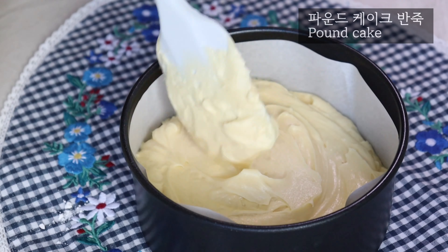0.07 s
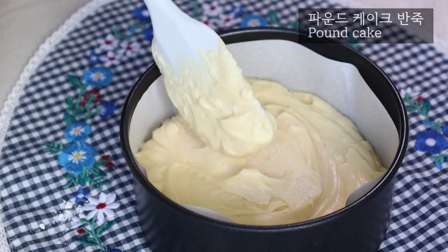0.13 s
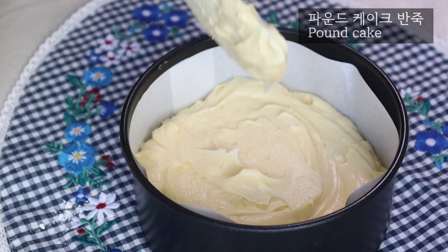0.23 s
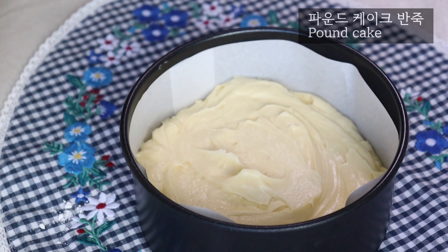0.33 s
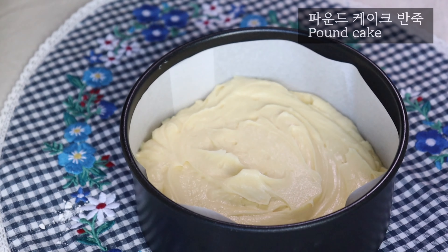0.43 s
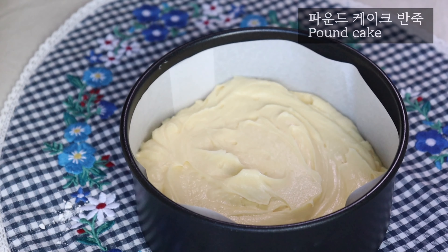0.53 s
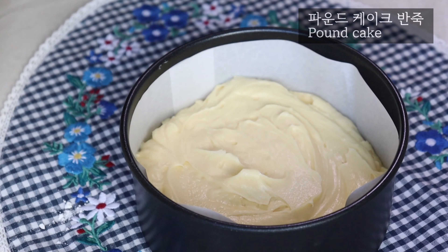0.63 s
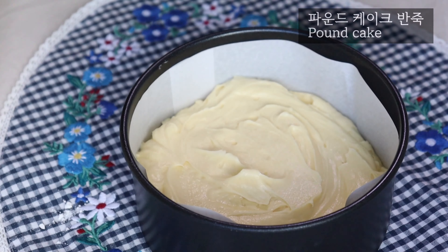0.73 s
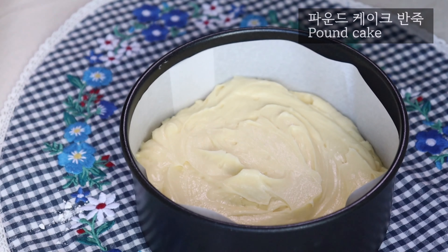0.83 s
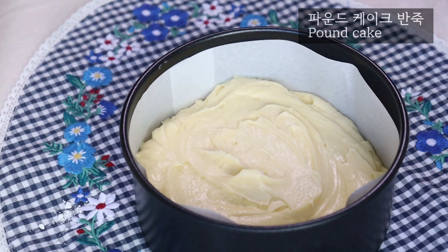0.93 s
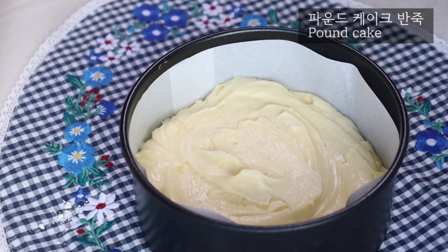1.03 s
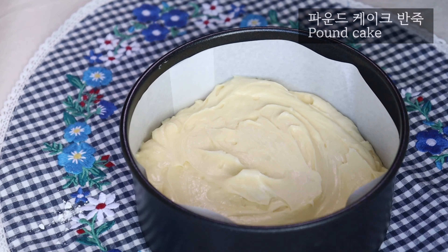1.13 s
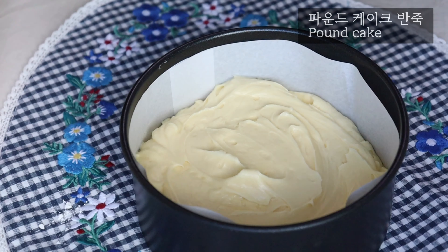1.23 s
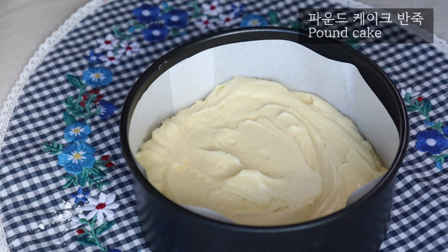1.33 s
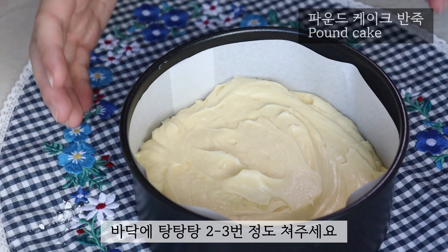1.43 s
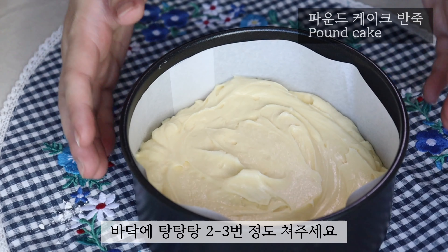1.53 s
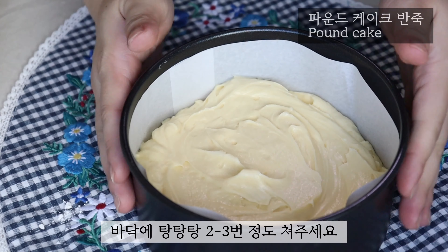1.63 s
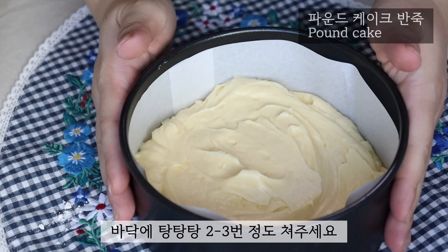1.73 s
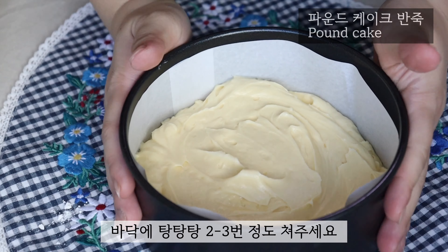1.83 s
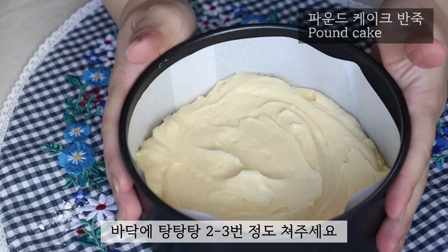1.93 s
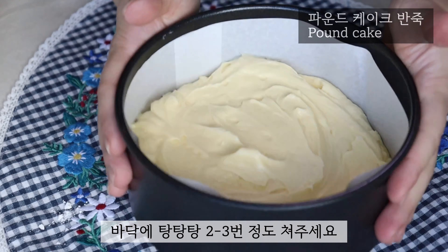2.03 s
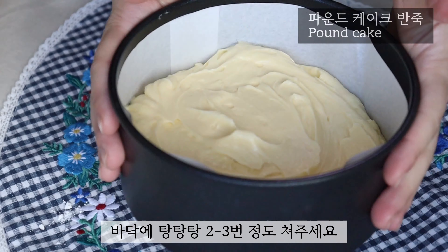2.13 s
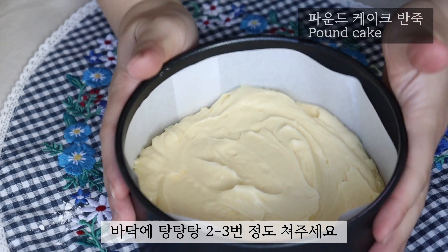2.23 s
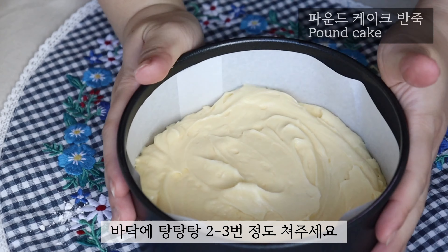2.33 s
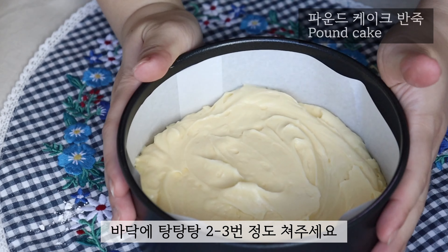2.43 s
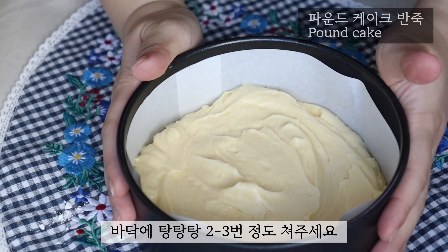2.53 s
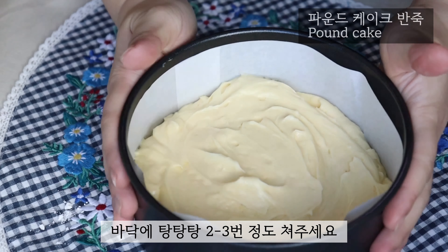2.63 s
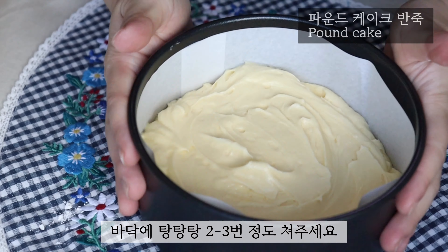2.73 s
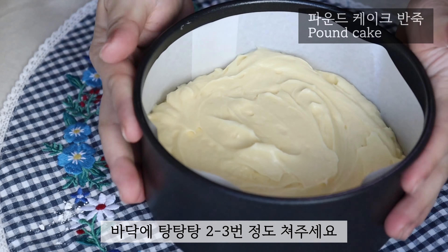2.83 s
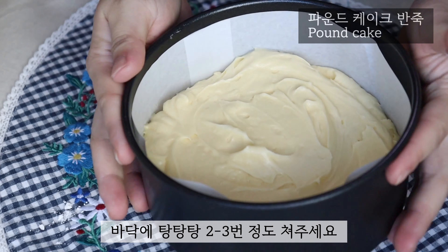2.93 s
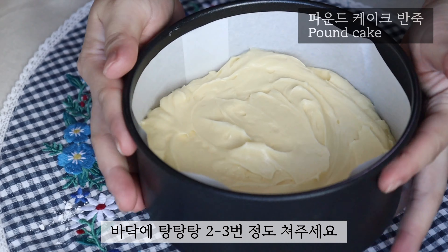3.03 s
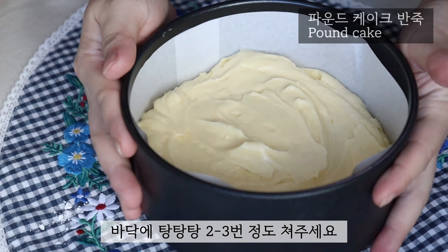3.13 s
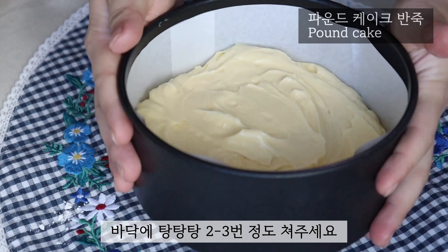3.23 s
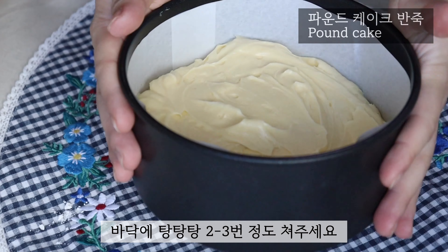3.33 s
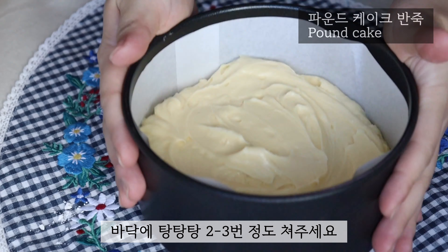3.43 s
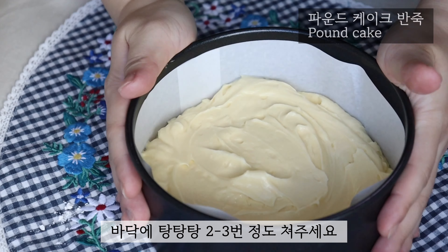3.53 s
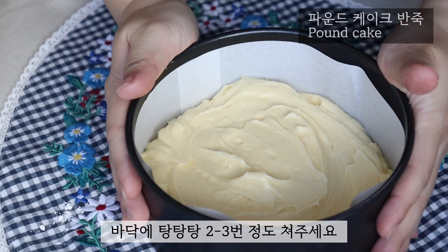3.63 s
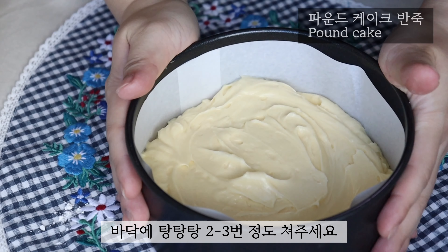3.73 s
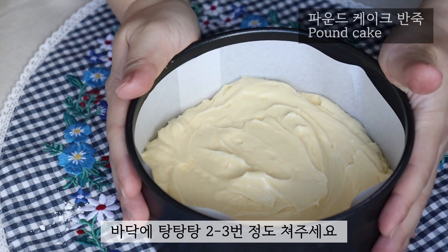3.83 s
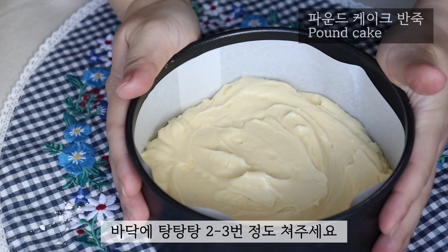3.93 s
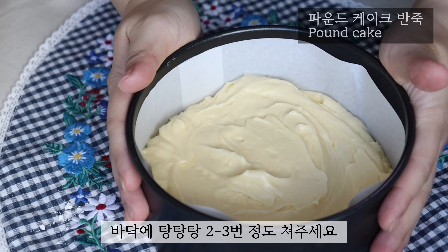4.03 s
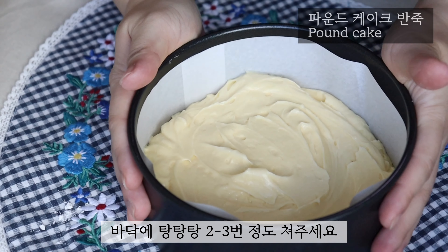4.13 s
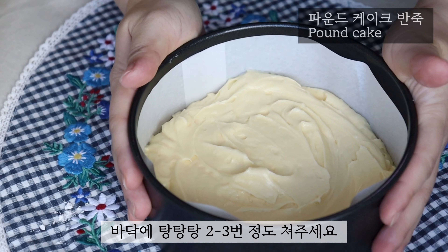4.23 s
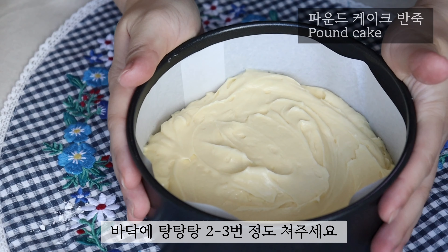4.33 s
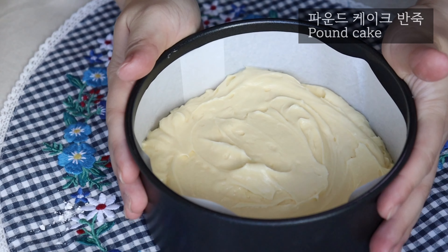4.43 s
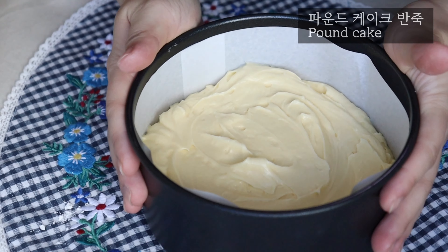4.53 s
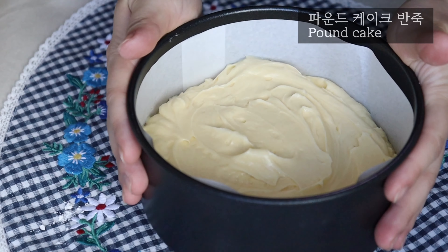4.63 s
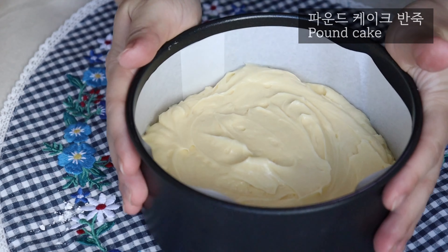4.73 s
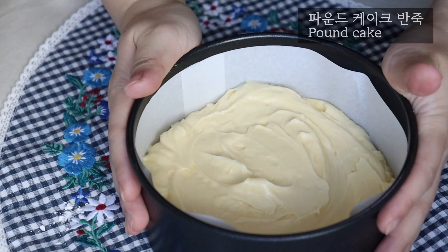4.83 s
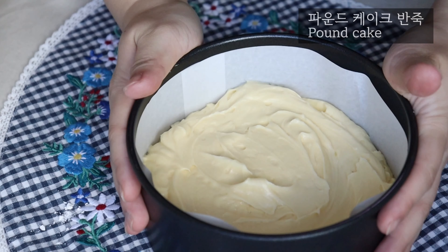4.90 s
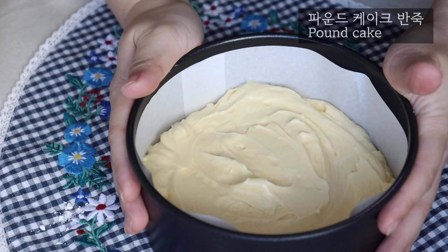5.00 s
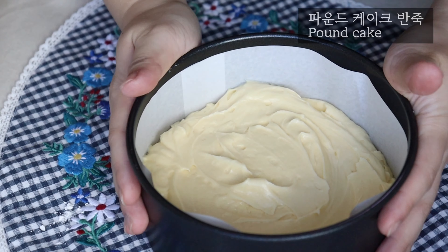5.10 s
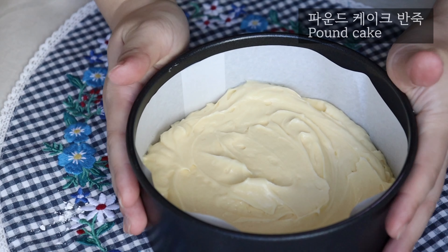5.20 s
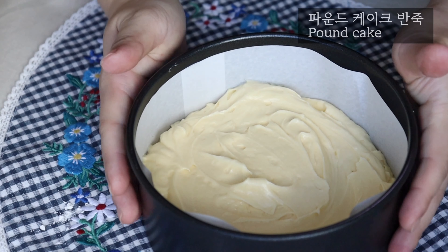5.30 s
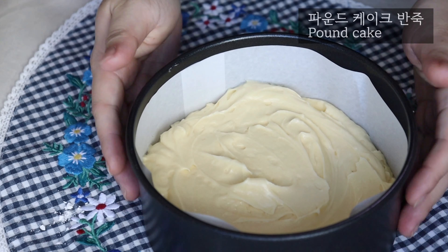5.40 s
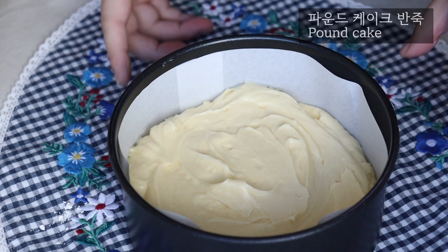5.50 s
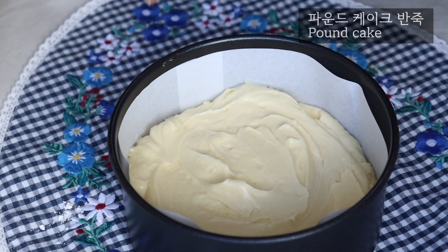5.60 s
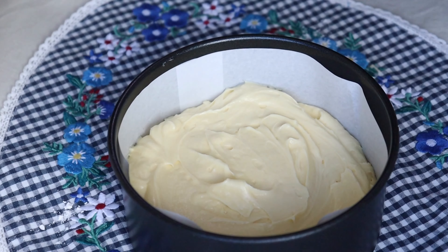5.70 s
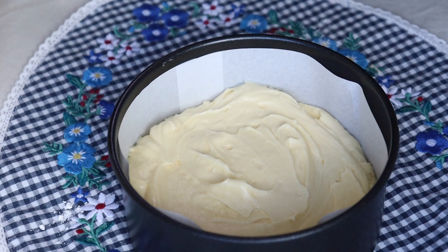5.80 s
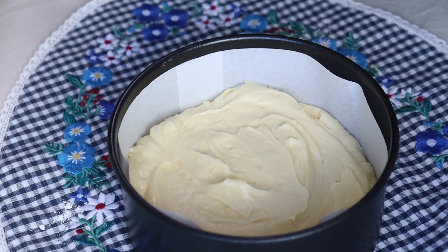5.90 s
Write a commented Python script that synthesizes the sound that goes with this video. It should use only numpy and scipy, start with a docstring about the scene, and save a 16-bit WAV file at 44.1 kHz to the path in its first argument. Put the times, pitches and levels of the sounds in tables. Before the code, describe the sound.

In a small, hard-walled kitchen, a spatula faintly brushes batter and a few tiny ticks sound near the microphone as a steady appliance hum steps down in pitch. Hands slide softly over a filled metal cake pan, then bang it on a cloth-covered table three times, a little over a second apart. Every deep thump brings a sharp metallic clatter right behind it. The pan shifts lightly and the hum carries on.

```python
"""A low appliance hum fills a small kitchen and drops abruptly in pitch about a second in.
Faint ticks sound close to the microphone; a spatula, then hands, brush a metal cake pan full of batter.
The pan is knocked three times on a cloth-covered table, with the hard room ringing around it.
Each knock is a low thud of the table top, then some 60 ms later a bright clank and rattle
as the pan's loose metal lands again."""
import sys
import numpy as np
from scipy import signal
from scipy.fft import rfft, irfft
from scipy.io import wavfile
from scipy.ndimage import uniform_filter1d

SR = 44100
rng = np.random.default_rng(int(sys.argv[2]) if len(sys.argv) > 2 else 0)


def generate_wav(sig):
    """Save sig (samples, or channels by samples) to the path in sys.argv[1] as 16-bit PCM at SR."""
    pcm = np.round(np.clip(np.atleast_2d(sig).T, -1, 1) * 32767).astype(np.int16)
    wavfile.write(sys.argv[1], SR, pcm)


N = 262836

# Room tone after the pitch drop. Each row: frequency in Hz, relative level in dB.
ROOM_TONE = [(25, -1), (62, 11), (95, 2.5), (150, 0.5), (300, 1.5), (480, 0.5), (600, -4.5), (1300, -8),
             (3500, -19.5), (4500, -21.5), (5050, -17.5), (5700, -23), (9000, -27), (15500, -30.5)]
# Appliance hum after the pitch drop. Each row: frequency in Hz, base rms level in dB, waver in dB.
HUM_LINES = [(51.4, -37, 2.6), (121.1, -49.5, 3.5), (146.3, -58.5, 6), (216.8, -51, 0.5), (239.6, -54, 2),
             (363.5, -53.5, 3.5), (396.5, -57, 2.5), (491, -66.5, 5), (1322, -65, 2.5), (2110, -69, 3)]
# The hum lines between 300 and 450 Hz swell and sink. Each row: time in seconds, gain in dB.
HUM_SWELL = [(0, 1), (1.1, -1.5), (1.4, 5), (1.8, 5.5), (2.15, 0.5), (2.7, 6), (2.95, -2.5), (4.3, -1.5),
             (5.96, -0.5)]
# The kitchen's reverberation. Each row: frequency in Hz, t60 in seconds.
ROOM_T60 = [(150, 0.47), (600, 0.44), (2000, 0.29), (6000, 0.28), (10000, 0.28), (16000, 0.23)]
# Strokes over batter, pan and cloth. Each row: start in seconds, length in seconds, level in dB.
BRUSH_STROKES = [(.05, 0.16, -59), (1.627, 0.27, -56), (1.91, .15, -62), (2.79, 0.11, -58),
                 (2.89, 0.14, -58), (3.05, .13, -56), (3.19, .11, -56.5), (3.3, 0.17, -56.5),
                 (5.2, 0.37, -62.5), (5.75, 0.27, -65)]
# Small high ticks. Each row: start in seconds, level in dB.
TICKS = [(0.925, -35), (0.941, -40), (.958, -39.5), (1.36, -48), (1.4265, -36), (1.449, -44)]
# The table top under the pan. Each row: frequency in Hz, relative level in dB, free t60 in seconds.
TABLE_MODES = [(59.5, -11.5, 0.52), (79, -6, 0.16), (103, -3.5, 0.023), (136, -8.5, 0.09), (190.3, -2, 0.4),
               (228, 0.5, 0.06), (256, -56, 0.045), (331.5, -6.5, 0.32), (388, -6, 0.1), (465, -13, 0.054),
               (576, -8, .06), (700, -36, 0.167)]
# The dull slap under the pan. Each row: frequency in Hz, relative level in dB.
SLAP_SPECTRUM = [(120, -2.5), (320, -6.5), (600, 5.5), (1000, -3.5), (2000, -4.5), (3500, -12.5),
                 (6000, -17.5), (7800, -25.5), (11500, -26.5), (16000, -37)]
# The pan's wall and base. Each row: frequency in Hz, relative level in dB, free t60 in seconds.
PAN_MODES = [(930, -14, 0.34), (1067, -10, 0.12), (1144, -8, 0.073), (1151, -3.5, 0.023), (1779, -4, 0.051),
             (1880, -6.5, 0.14), (1997, -3, 0.093), (2846, -6.5, 0.22), (3266, -13, 0.37),
             (3560, -10, 0.11), (3623, -17, 0.72), (4200, -1.5, 0.064), (4250, -23, 0.098),
             (4330, -19, 0.8), (4540, -5, 0.076), (4930, -36, 0.143), (4830, -12, 0.039),
             (5575, -3.5, 0.27), (5650, -8, 0.17), (6530, -11, 0.41), (7881, -13, 0.38),
             (8630, -10.5, 0.16), (9890, -9, 0.081), (10440, -11.5, 0.041), (11270, -11.5, 0.053),
             (11370, -6.5, 0.043)]
# The pan's crowd of weaker modes. Each row: frequency in Hz, relative level in dB.
PAN_WASH = [(250, 2.5), (600, 0), (1150, 1), (1500, -8), (1950, -2), (2500, 0), (4400, 0), (5900, -1),
            (7200, -8), (10200, -6.5), (12500, -9), (16000, -19)]
# Light shifts of the pan. Each row: start in seconds, level in dB, tilt in dB per octave.
NUDGES = [(3.995, -30, -4), (5.087, -39, -14)]
# The pan meets the table. Each row: start in seconds, level in dB, contact in ms, share of the free
# ring time, then in dB: slap, far edge relative to the blow, far edge's slap, first rock, settling.
KNOCKS = [(2.2979, -3, 3.62, 0.47, -14, -14.5, -16, -24, -20.5),
          (3.544, -3, 6, 0.79, -21.5, -5, -14.5, -11, -17.5),
          (4.8366, -5, 7, 0.56, -26, -4.5, -19.5, -12.5, -46)]
# Loose metal lands. Each row: start in seconds, level in dB, tilt in dB per octave, share of the free
# ring time, favoured frequency in Hz, first rattle gap in seconds, first rebound relative to the
# landing in dB, fall per rebound in dB.
LANDINGS = [(2.369, 0, -1.5, 1, 5500, .0123, -3, 2.5), (3.609, 2, -1, 1, 2840, .013, 1.5, 7),
            (4.897, 3, -1, 0.4, 4400, .0027, -3.5, 4)]


def undb(db):
    """Decibels to gain."""
    return 10 ** (np.asarray(db) / 20)


def unit(x):
    """Scale to rms 1."""
    return x / np.sqrt(np.mean(x ** 2))


def seconds(length):
    """Time axis."""
    return np.arange(int(length * SR)) / SR


def add(out, start_s, x):
    """Mix x into out at start_s."""
    i = int(start_s * SR)
    out[i:i + len(x)] += x[:N - i]


def lookup(points, hz):
    """Read (Hz, value) points on a log-frequency axis."""
    freqs, values = np.transpose(points)
    return np.interp(np.log(np.maximum(hz, 1)), np.log(freqs), values)


def noise(points, size):
    """Noise of rms 1 with a (Hz, dB) spectrum."""
    gain = undb(lookup(points, np.fft.rfftfreq(size, 1 / SR)))
    return unit(irfft(rfft(rng.standard_normal(size)) * gain, size))


def band(x, lo_hz, hi_hz):
    """Band-pass."""
    edges = [lo_hz, min(hi_hz, SR / 2 - 10)]
    return signal.sosfilt(signal.butter(2, edges, "band", fs=SR, output="sos"), x)


def fade(t, t60):
    """Free decay, 60 dB in t60 seconds."""
    return np.exp(-np.log(1000) * t / t60)


def drift(rate_hz):
    """Smooth random drift of rms 1."""
    size = int(SR / rate_hz)
    held = np.repeat(rng.standard_normal(N // size + 1), size)
    return unit(uniform_filter1d(uniform_filter1d(held, size), size)[:N])


def appliance_hum(pitch_ratio, room_tone_db=-43, wander=0.00271):
    """Wavering hum lines over the room tone, all pitched by one ratio."""
    flutter_db = 0.5 * drift(5)
    room_tone = noise([(hz * pitch_ratio, db) for hz, db in ROOM_TONE], N)
    out = undb(room_tone_db + flutter_db) * room_tone
    swell_db = np.interp(np.arange(N) / SR, *np.transpose(HUM_SWELL))
    for hz, db, waver_db in HUM_LINES:
        phase = 2 * np.pi * np.cumsum(hz * pitch_ratio * (1 + wander * drift(4))) / SR
        level_db = db + swell_db * (300 < hz < 450) + waver_db * drift(14)
        out += np.sqrt(2) * undb(level_db) * np.sin(phase)
    return out


def background(drop_s=0.92, crossfade_s=0.0063, early_ratio=1.195):
    """The hum starts higher and drops abruptly in pitch."""
    late = np.clip((np.arange(N) / SR - drop_s) / crossfade_s, 0, 1)
    return np.sqrt(1 - late) * appliance_hum(early_ratio) + np.sqrt(late) * appliance_hum(1)


def kitchen(x, wet_db, bass_db=-8, build_s=0.021):
    """Direct sound reaches the microphone, then a small room's dense reflections; treble dies first."""
    t = seconds(0.7)
    tail = 0
    for lo_hz in 62.5 * 2.0 ** np.arange(9):
        centre_hz = lo_hz * np.sqrt(2)
        gain = undb(lookup([(200, bass_db), (700, 0)], centre_hz))
        octave = band(rng.standard_normal(len(t)), lo_hz, 2 * lo_hz)
        tail += gain * octave * fade(t, lookup(ROOM_T60, centre_hz))
    tail *= 1 - np.exp(-(t / build_s) ** 2)
    tail /= np.sqrt(np.sum(tail ** 2))
    return x + undb(wet_db) * signal.fftconvolve(x, tail)[:N]


def brushing():
    """Spatula, then hands, slide lightly: each stroke swells and sinks as a crackle of tiny slips."""
    pressure = np.zeros(N)
    for start_s, length_s, db in BRUSH_STROKES:
        add(pressure, start_s, undb(db) * np.sin(np.pi * seconds(length_s) / length_s) ** 2)
    slips = undb(3 * drift(500) + 2 * drift(70))
    return unit(band(slips * rng.standard_normal(N), 5900, 12200)) * pressure


def ticks(t60=0.06, snap_db=-12, rise_s=0.0014):
    """Tiny clicks that ring briefly in one high resonance."""
    out, t = np.zeros(N), seconds(0.2)
    attack = 1 - np.exp(-t / rise_s)
    for start_s, db in TICKS:
        white = rng.standard_normal(len(t))
        ring = unit(band(white, 4830, 5360)) * fade(t, t60)
        snap = unit(band(white, 3500, 13000)) * fade(t, t60 / 2)
        add(out, start_s, undb(db) * (ring + undb(snap_db) * snap) * attack)
    return out


def slap(t60=0.087, rise_s=0.0027):
    """Base, cloth and paper liner clap together without ringing."""
    t = seconds(0.6)
    return noise(SLAP_SPECTRUM, len(t)) * fade(t, t60) * (1 - np.exp(-t / rise_s))


def thud(contact_ms, ring, puff_db=-10):
    """A cushioned push rings the table top; a longer contact leaves only the lowest modes."""
    t = seconds(0.6)
    force = np.sin(np.pi * np.minimum(t / (contact_ms / 1000), 1)) ** 2
    # the top radiates its acceleration, so the sound follows the change of the force
    change = np.gradient(force / force.sum()) * SR
    modes = sum(undb(db) * np.cos(2 * np.pi * hz * t) / (2 * np.pi * hz) * fade(t, t60 * ring)
                for hz, db, t60 in TABLE_MODES)
    # the stopping pan also squeezes air out and sucks it back
    puff = undb(puff_db) * change / change.max()
    return signal.fftconvolve(change, modes)[:len(t)] + puff


def clank(tilt_db, ring, favoured_hz):
    """Metal on metal: a short crack, a wash of dense modes and the pan's strong modes."""
    pivot_hz, detune_spread, rise_s = 3000, 0.00127, 0.000096
    favour_db, favour_octaves = 7, 0.14
    t = seconds(0.8)
    spectrum = [(hz, db + tilt_db * np.log2(hz / pivot_hz)) for hz, db in PAN_WASH]
    crack = undb(-18) * fade(t, t60=0.072)
    wash = undb(-26) * ring * fade(t, t60=0.2)
    out = noise(spectrum, len(t)) * (crack + wash)
    # large swings die fast against the batter; the rest rings on as the grip allows
    clash = undb(-21) * fade(t, t60=0.05)
    for hz, db, t60 in PAN_MODES:
        scatter_db, detune, start_cycles = rng.standard_normal(3)
        # the place of contact picks out some modes
        place_db = favour_db * np.exp(-(np.log2(hz / favoured_hz) / favour_octaves) ** 2)
        gain = undb(db + place_db + scatter_db + tilt_db * np.log2(hz / pivot_hz))
        ring_on = undb(-29) * ring * fade(t, t60 * ring)
        cycles = hz * (1 + detune_spread * detune) * t + start_cycles
        out += gain * (clash + ring_on) * np.sin(2 * np.pi * cycles)
    return out * (1 - np.exp(-t / rise_s))


def nudges():
    """The pan shifts against cloth and fingers with a faint, damped clank."""
    out = np.zeros(N)
    for start_s, db, tilt_db in NUDGES:
        add(out, start_s, undb(db) * clank(tilt_db, ring=0.36, favoured_hz=5620))
    return out


def knocks():
    """The base hits the table near edge first, then far edge; it rocks, and the batter settles."""
    edge_lag_s, edge_contact_share = 0.0096, 0.623
    rock_lag_s, rock_gap_s, rock_softening, rock_fall_db, slap_fall_db = 0.02, 0.0135, 1.65, 2.5, 4
    settle_lag_s, settle_gap_s, settle_fall_db = 0.12, 0.058, 2.5
    out = np.zeros(N)
    for start_s, db, contact_ms, ring, slap_db, edge_db, edge_slap_db, rock_db, settle_db in KNOCKS:
        near_edge = undb(db) * thud(contact_ms, ring)
        add(out, start_s, near_edge + undb(slap_db) * slap())
        far_edge = undb(db + edge_db) * thud(contact_ms * edge_contact_share, ring)
        add(out, start_s + edge_lag_s, far_edge + undb(edge_slap_db) * slap())
        for k in range(3):
            rock = thud(contact_ms=3.17 * rock_softening ** k, ring=0.88)
            rock *= undb(rock_db - k * rock_fall_db)
            rock_slap = undb(edge_slap_db - (k + 1) * slap_fall_db) * slap()
            add(out, start_s + rock_lag_s + k * rock_gap_s, rock + rock_slap)
        # the batter's weight comes down in two slow pushes
        push = undb(settle_db) * thud(contact_ms=11.8, ring=2.2)
        add(out, start_s + settle_lag_s, push)
        add(out, start_s + settle_lag_s + settle_gap_s, undb(-settle_fall_db) * push)
    return out


def rattles(graze_db=-12.5, graze_lead=0.4, gap_growth=1.8, rim_hz=10240, rebound_tilt_db=0.5):
    """Loose metal grazes, lands, then rebounds ever slower on the thin rim, which favours high modes."""
    out = np.zeros(N)
    for at_s, db, tilt_db, ring, favoured_hz, gap_s, rebound_db, fall_db in LANDINGS:
        graze = clank(tilt_db, 0.55 * ring, rim_hz)
        add(out, at_s - graze_lead * gap_s, undb(db + graze_db) * graze)
        add(out, at_s, undb(db) * clank(tilt_db, ring, favoured_hz))
        for k in range(3):
            at_s += gap_s * gap_growth ** k
            rebound = clank(tilt_db + rebound_tilt_db, ring, rim_hz)
            add(out, at_s, undb(db + rebound_db - k * fall_db) * rebound)
    return out


def scene():
    """One microphone in the kitchen: the pan with the room around it, the ticks close and nearly dry."""
    pan = kitchen(knocks() + rattles() + nudges(), wet_db=-7)
    close_ticks = kitchen(ticks(), wet_db=-14)
    return (pan + close_ticks + brushing() + background())[None]


def record(dry, top_hz=15900):
    """The microphone overloads on the hardest thuds; the highest treble is cut."""
    low_pass = signal.ellip(10, 0.1, 80, top_hz, fs=SR, output="sos")
    return signal.sosfilt(low_pass, np.clip(dry, -1, 1))


dry = scene()
out = record(dry)
generate_wav(out)
```